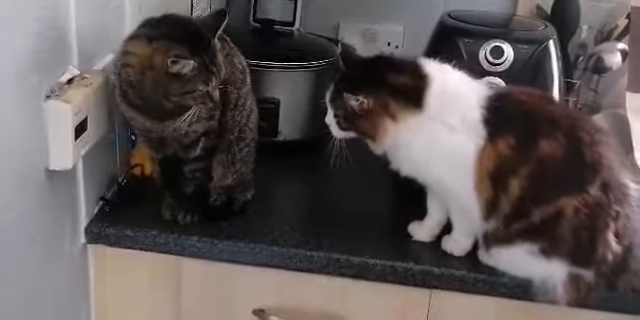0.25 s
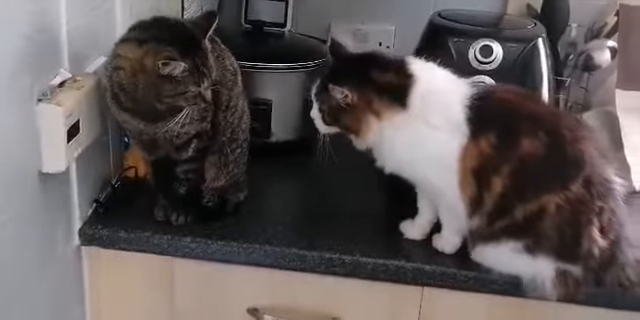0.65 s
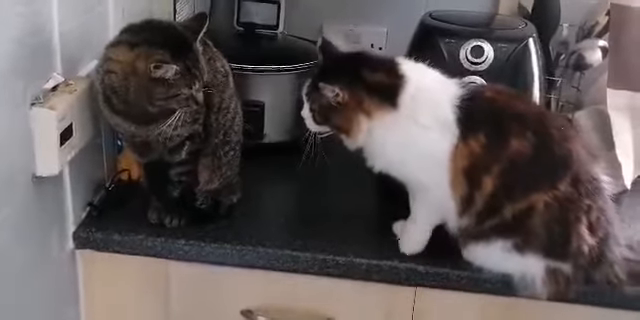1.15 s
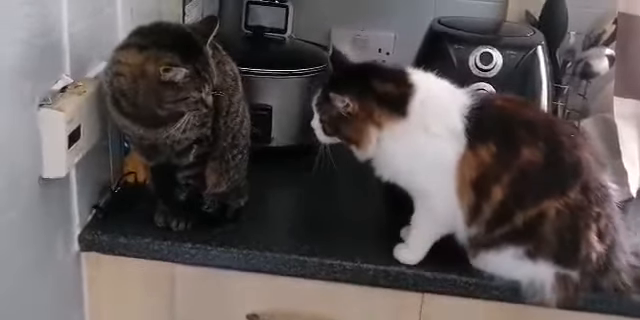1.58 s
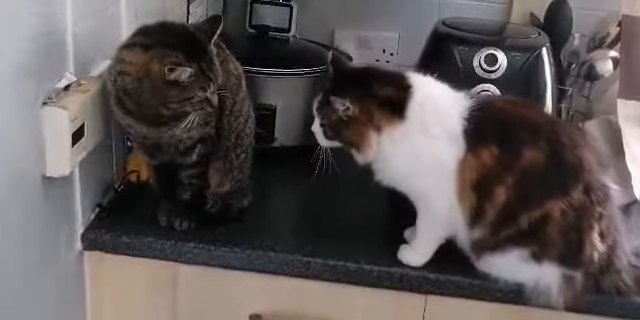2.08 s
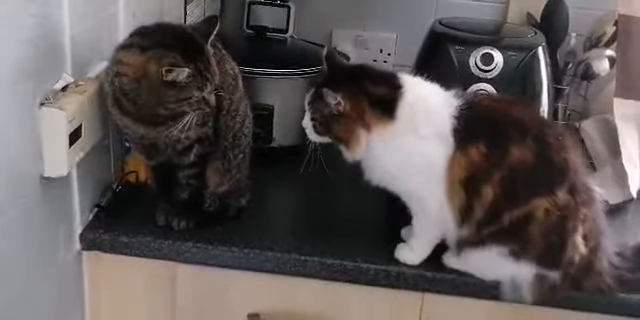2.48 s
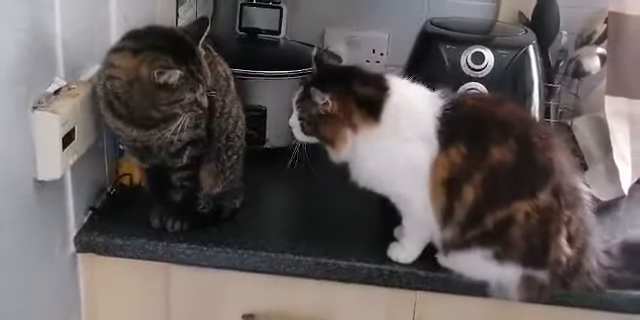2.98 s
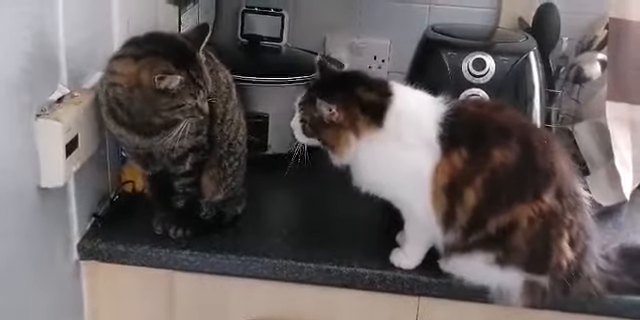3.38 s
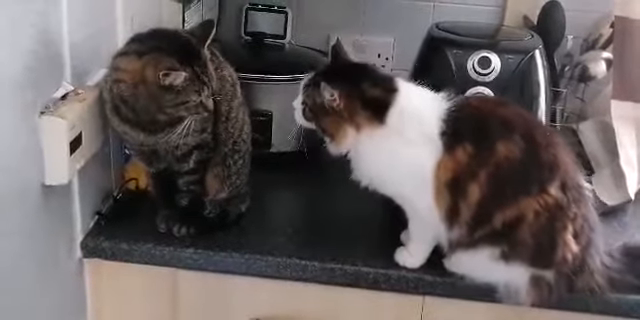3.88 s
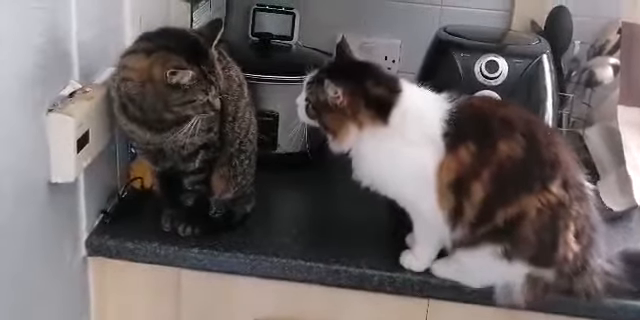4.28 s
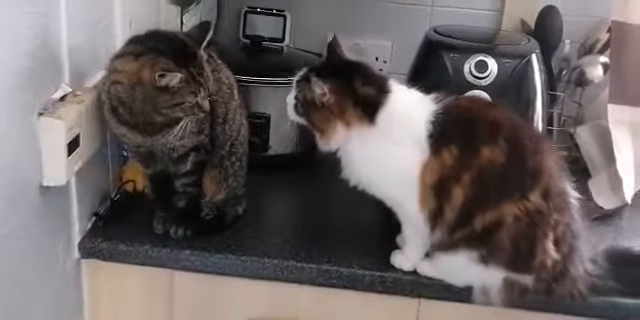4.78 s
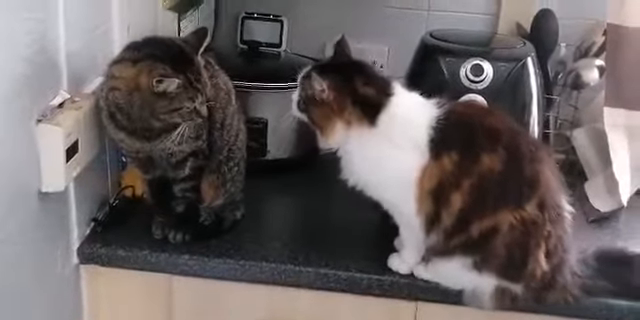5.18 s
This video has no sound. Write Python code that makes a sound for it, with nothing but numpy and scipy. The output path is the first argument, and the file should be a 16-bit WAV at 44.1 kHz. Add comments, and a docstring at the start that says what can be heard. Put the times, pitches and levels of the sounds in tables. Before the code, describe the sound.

A cat yowls right from the start, close to the microphone in a small kitchen with a short echo. The note is briefly bright, rises a little, then turns pure and sinks, ending at about 1.5 seconds. A pause follows with only quiet background. At about 3.2 seconds the cat starts a second warning yowl, harsh and open-mouthed. The voice cracks between registers, jumping higher around 3.5 seconds and dropping back at 3.7, then closes into a softer moan that sags and fades by 4.9 seconds. Two faint, dull knocks come in quick succession at about 5.1 and 5.2 seconds. Far behind the cat, a soft, brief rustle recurs about once a second, with a small cluster around 4.5 seconds and a last one near 5.3. A low wavering hum and faint room noise continue throughout.

```python
"""Cat yowling in a small kitchen

Close to a single microphone, a cat gives two long warning yowls at another cat. The first starts briefly
bright, then turns pure and sinks; the second starts harsh and open-mouthed, breaks between registers
and closes into a moan. Behind them lie a soft rustle once a second, two dull knocks, a low hum and
faint room noise."""
import sys
import numpy as np
from scipy import signal
from scipy.fft import rfft, irfft, next_fast_len
from scipy.io import wavfile

SR = 44100
rng = np.random.default_rng(int(sys.argv[2]) if len(sys.argv) > 2 else 0)


def store_wav(level_fs):
    """Save 16-bit WAV to argv[1]."""
    pcm = np.round(np.clip(np.atleast_2d(level_fs), -1, 1) * 32767)
    wavfile.write(sys.argv[1], SR, pcm.T.astype(np.int16))


N = 240118
TIME = np.arange(N) / SR


# the vocal folds' note: time_s, pitch_hz
FIRST_PITCH = [(0, 511), (.07, 537), (.11, 589.9), (.19, 626.7), (.25, 658.6), (.44, 654.8), (.56, 622.9),
               (.69, 641), (.82, 622.3), (1, 608.6), (1.13, 591), (1.22, 573.2), (1.31, 544.4), (1.44, 487)]
# voicing: time_s, effort_db, tilt_db_per_octave, opening (0-1), roughness (0-1), high_partials_db
FIRST_VOICE = [(0, -48, 5.5, 0.16, 0.32, -76.5), (.07, -45.5, 3.5, 0, 0.15, -78.5),
               (.15, -40.5, -10, 0, 0.19, -83.5), (.33, -44.5, -13.5, 0.65, 0, -93),
               (.55, -43.5, -15, 0.03, 0.15, -92.5), (.9, -39.5, -20, 0.13, 0.08, -88.5),
               (1.22, -42.5, -16.5, 0.03, 0.05, -100), (1.385, -49, -17.5, 0, 0.36, -102),
               (1.45, -67.5, -9, 0.13, .26, -103)]
# partials 1-5 at the folds: gain_db
FIRST_PARTIALS = [-3.5, 2, -6, -0.5, -8.5]

def first_yowl():
    """One unbroken note that arches up and sinks."""
    return yowl(FIRST_PITCH, FIRST_VOICE, FIRST_PARTIALS, sheen_hz=6390, sheen_db=-8.5)


# the vocal folds' note: time_s, pitch_hz
SECOND_PITCH = [(3.2, 592), (3.225, 551.5), (3.245, 581.3), (3.263, 591), (3.28, 479), (3.36, 514.5),
                (3.41, 510.3), (3.455, 528), (3.48, 602.5), (3.535, 634), (3.58, 637.6), (3.61, 668.4),
                (3.632, 647), (3.655, 678.6), (3.695, 604.4), (3.715, 522.8), (3.86, 510.4), (3.91, 531.6),
                (3.97, 520), (4.32, 510), (4.69, 482.2), (4.78, 440.7), (4.89, 431)]
# voicing: time_s, effort_db, tilt_db_per_octave, opening (0-1), roughness (0-1), high_partials_db
SECOND_VOICE = [(3.203, -53, 0, 0.76, 0.027, -68), (3.25, -43.5, -1, 0.79, 0.082, -53),
                (3.315, -39.5, 0.5, 0.78, .27, -72.5), (3.359, -45, -0.5, 0.69, 0.34, -71),
                (3.415, -40.5, -0.5, 0.48, 0.22, -62.5), (3.442, -49, 3.5, .16, 0.37, -64.5),
                (3.509, -40, -3, .06, 0.14, -73.5), (3.665, -40, -4.5, 0.15, 0.077, -64),
                (3.707, -42.5, -6, 0.099, 0.19, -77), (3.781, -47, -1, 0.096, .09, -81.5),
                (4.301, -44.5, -5.5, 0.063, 0.13, -94), (4.48, -53, -2, 0.17, 0.36, -82.5),
                (4.682, -43, -6, 0.15, 0.15, -99), (4.886, -63.5, -5.5, 0.12, 0.52, -100)]
# partials 1-5 at the folds: gain_db
SECOND_PARTIALS = [-5, -3, .8, -3, -0.5]
# cracks between registers: time_s, added_roughness (0-1)
BREAKS = [(3.276, 0.35), (3.469, 0.36), (3.691, 0)]

def second_yowl(crack_s=0.013):
    """The voice cracks as it jumps between registers, then sinks."""
    cracks = sum(bell(TIME, s, crack_s, extra) for s, extra in BREAKS)
    return yowl(SECOND_PITCH, SECOND_VOICE, SECOND_PARTIALS, sheen_hz=5720, sheen_db=-20, cracks=cracks)


# throat resonances on the high partials: frequency_hz, gain_db
THROAT = [(2150, -2), (2550, -4), (2800, -16), (3100, -14.5), (3350, -5), (3620, 0.5), (3900, -9.5),
          (4400, -31.5), (5200, -27), (6000, -43.5)]
# turbulent breath: frequency_hz, gain_db
RASP_COLOUR = [(300, -48.5), (700, -28.5), (1100, -8), (1600, -0.5), (2300, -6.5), (3100, -12.5),
               (3900, -9.5), (4300, -27.5), (4800, -20), (5900, -23), (6600, -40), (7400, -33)]

def yowl(pitch, voicing, partials_db, sheen_hz, sheen_db, cracks=0):
    """Vocal folds make a stack of partials; uneven cycles and puffs of turbulence roughen it."""
    jitter, tremor, shimmer = 0.024, 0.0022, 0.43
    rise_s, fade_s = 0.002, 0.067
    pitch_hz, effort_db, tilt_db, opening, rough, high_db = curves(pitch) + curves(voicing)
    rough = np.clip(rough + cracks, 0, 1)
    throat_scale = 0.95 + 0.15 * opening  # resonances sink as the mouth closes
    # cycle length and strength vary for all partials together
    cycles = np.cumsum(pitch_hz * (1 + jitter * rough * wander(110) + tremor * wander(52))) / SR
    strength = 1 + shimmer * rough * wander(140)
    voice = np.zeros(N)
    for k in range(1, 15):
        hz = k * pitch_hz
        if k <= len(partials_db):
            folds_db = effort_db + partials_db[k - 1] + tilt_db * np.log2(k)
            db = folds_db + mouth_db(hz, opening) + standing_waves_db(hz)
        else:
            db = high_db + read(THROAT, hz / throat_scale)
        sheen = bell(hz, sheen_hz, 400, gain_of(high_db + sheen_db))
        flutter_db = (0.8831 + rough) * k ** 0.71 * wander(38)
        level = (gain_of(db) + sheen) * gain_of(flutter_db)
        voice += level * np.sqrt(2) * np.sin(2 * np.pi * (k * cycles + rng.random()))
    # air escapes in one puff a cycle, louder through an open mouth
    puffs = 1 + 0.24 * np.cos(2 * np.pi * cycles)
    rasp_db = effort_db - 17 + 15.5 * opening + tilt_db
    rasp = rough * gain_of(rasp_db) * noise(RASP_COLOUR) * puffs
    rise = np.clip((TIME - voicing[0][0]) / rise_s, 0, 1)
    fade = np.clip((voicing[-1][0] - TIME) / fade_s, 0, 1)
    return (voice * strength + rasp) * (rise * fade) ** 2


def mouth_db(hz, opening, shut_hz=508, open_hz=1544, width_hz=163.6):
    """Opening the mouth raises its main resonance and brings in a second; the nose always rings."""
    centre_hz = shut_hz + (open_hz - shut_hz) * opening
    main_db = -10 * np.log10(1 + ((hz - centre_hz) / width_hz) ** 2)
    second_db = opening * bell(hz, 2130, 280, 13)
    nasal_db = bell(hz, 2600, 27, 2.1)
    return main_db + second_db + nasal_db


# room modes at the microphone: frequency_hz, half_width_hz, gain_db
STANDING_WAVES = [(500, 7, -6.5), (558.8, 8, -9.5), (604.5, 2.6, -11), (597.6, 3.5, -5), (607.4, 6.5, 1.5),
                  (632.3, 1.8, -8.5), (655, 7.4, -7.5), (1019.4, 14.2, 5.5), (1110, 57, -8), (1710, 89, 3)]

def standing_waves_db(hz):
    """A partial dips or swells as it glides through one of the kitchen's standing waves."""
    return sum(bell(hz, *wave) for wave in STANDING_WAVES)


# faint rustles in the room: centre_s, level_db
RUSTLES = [(.355, -73.5), (1.355, -75), (2.354, -74), (3.358, -77), (4.348, -71), (4.489, -74.5),
           (4.572, -77), (5.35, -69)]
# their spectrum: frequency_hz, gain_db
RUSTLE_COLOUR = [(200, -20.5), (550, 8.5), (780, 2.5), (1150, -4.5), (1570, 3.5), (2100, -6), (2500, 1.5),
                 (2900, 2.5), (3600, -3.5), (4300, -2.5), (5000, -8.5), (6000, -8.5), (7400, -19)]

def rustles(half_s=0.0495, grain_db=2):
    """Brief, slightly grainy swishes of noise."""
    level = sum(gain_of(db) * np.exp(-np.abs((TIME - s) / half_s) ** 3) for s, db in RUSTLES)
    return level * noise(RUSTLE_COLOUR) * gain_of(grain_db * wander(230))


# small knocks after the cat falls silent: start_s, level_db, pitch_hz
KNOCKS = [(5.125, -62, 436), (5.196, -56.5, 420)]

def knocks(t60_s=0.018):
    """Each dull knock rings for only a few cycles."""
    out = np.zeros(N)
    for start_s, level_db, pitch_hz in KNOCKS:
        age = np.clip(TIME - start_s, 0, 1)
        out += gain_of(level_db - 60 * age / t60_s) * np.sin(2 * np.pi * pitch_hz * age)
    return out


# the room's decay: frequency_hz, t60_s
REVERB_DECAY = [(250, 0.12), (600, 0.54), (1100, 0.41), (1700, 0.36), (3500, 0.22), (7000, 0.13)]
# reverberation at the microphone: frequency_hz, gain_db
REVERB_LEVEL = [(500, -17.5), (680, -15.5), (1050, -9.5), (1500, -8.5), (2200, -5.5), (6000, -7)]

def kitchen(direct, echoes_per_s=3000, gap_s=0.005):
    """Dense reflections from nearby walls and cupboards, each band dying at its own speed."""
    length = SR // 2
    echoes = rng.standard_normal(length) * (rng.random(length) < echoes_per_s / SR)
    hz, t, bands = signal.stft(echoes * (TIME[:length] > gap_s), SR, nperseg=256)
    decay = gain_of(-60 * t / read(REVERB_DECAY, hz)[:, None])
    _, tail = signal.istft(bands * decay, SR, nperseg=256)
    wet = signal.fftconvolve(direct, tail / np.linalg.norm(tail))
    colour = gain_of(read(REVERB_LEVEL, np.fft.rfftfreq(len(wet), 1 / SR)))
    return direct + irfft(rfft(wet) * colour)[:N]


# room noise around the microphone: frequency_hz, gain_db
AIR_COLOUR = [(20, -1.5), (70, -6.5), (120, -13), (170, -14), (250, -13.5), (350, -15), (480, -15),
              (750, -19), (920, -17), (1300, -23), (2700, -26), (4900, -32.5), (7400, -39.5)]
# slow swell of the background: time_s, air_gain_db, hum_gain_db
SWELL = [(0, 3, 0), (1.7, 3.5, 1), (3.1, 0, -4), (3.7, 3.5, 0), (4.4, 3.5, 1), (4.9, 2, -2), (5.25, 2, 2)]

def room_tone(hum_hz=49.34, hum_db=-65, third_db=-23, waver=0.034, throb=0.13, air_db=-73):
    """A wavering low hum with a weak third partial, over faint room noise."""
    air_swell_db, hum_swell_db = curves(SWELL)
    phase = 2 * np.pi * np.cumsum(hum_hz * (1 + waver * wander(4))) / SR
    hum = unit_rms(np.sin(phase) + gain_of(third_db) * np.sin(3 * phase))
    hum *= gain_of(hum_db + hum_swell_db) * (1 + throb * wander(52))
    air = gain_of(air_db + air_swell_db + wander(27)) * noise(AIR_COLOUR)
    return hum + air


def gain_of(db):
    """Decibels to amplitude."""
    return 10 ** (np.asarray(db) / 20)


def unit_rms(x):
    """Scales to rms 1."""
    return x / np.sqrt(np.mean(x ** 2) + 1e-20)


def bell(x, centre, half_width, height):
    """A bell-shaped bump or dip."""
    return height * np.exp(-((x - centre) / half_width) ** 2)


def read(points, hz):
    """A spectrum's value at hz, on a log-frequency axis."""
    points_hz, values = np.transpose(points)
    return np.interp(np.log(hz + 1), np.log(points_hz + 1), values)


def curves(rows):
    """Each column of a timed table, at every sample."""
    time_s, *columns = np.transpose(rows)
    return [np.interp(TIME, time_s, column) for column in columns]


def shaped_noise(gain_at):
    """Noise of rms 1, weighted by a function of frequency."""
    size = next_fast_len(N, real=True)
    spectrum = rfft(rng.standard_normal(size)) * gain_at(np.fft.rfftfreq(size, 1 / SR))
    return unit_rms(irfft(spectrum)[:N])


def noise(colour):
    """Noise of rms 1 with the given spectrum."""
    return shaped_noise(lambda hz: gain_of(read(colour, hz)))


def wander(rate_hz):
    """Random motion of rms 1, no faster than about rate_hz."""
    return shaped_noise(lambda hz: 1 / (1 + (hz / rate_hz) ** 4))


def scene():
    """The cat and the small noises in the kitchen, over the room tone, in mono."""
    sources = first_yowl() + second_yowl() + rustles() + knocks()
    return (kitchen(sources) + room_tone())[None]


def record(dry):
    """The recorder passes the microphone's signal up to about 7.5 kHz."""
    lowpass = signal.firwin(511, 7520, window=("kaiser", 9), fs=SR)
    return signal.oaconvolve(dry, lowpass[None], "same")


dry = scene()
out = record(dry)
store_wav(out)
```